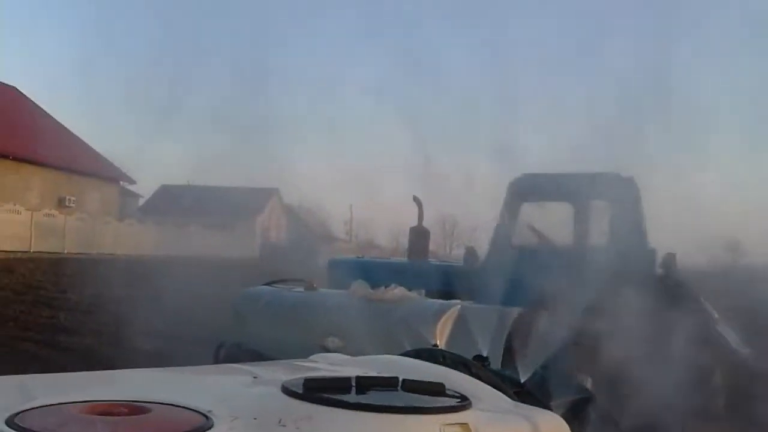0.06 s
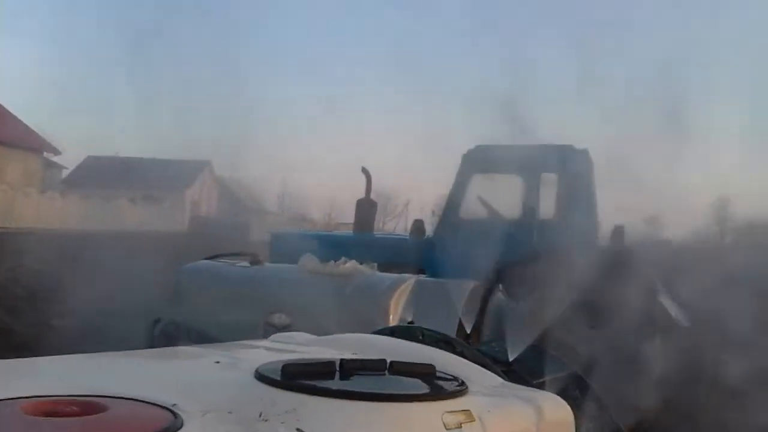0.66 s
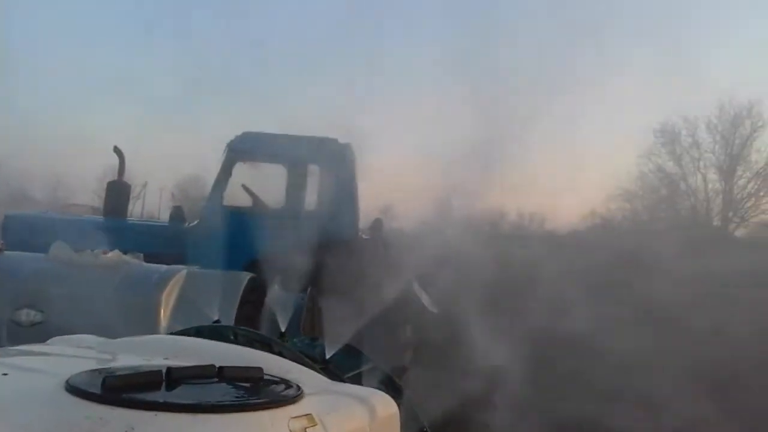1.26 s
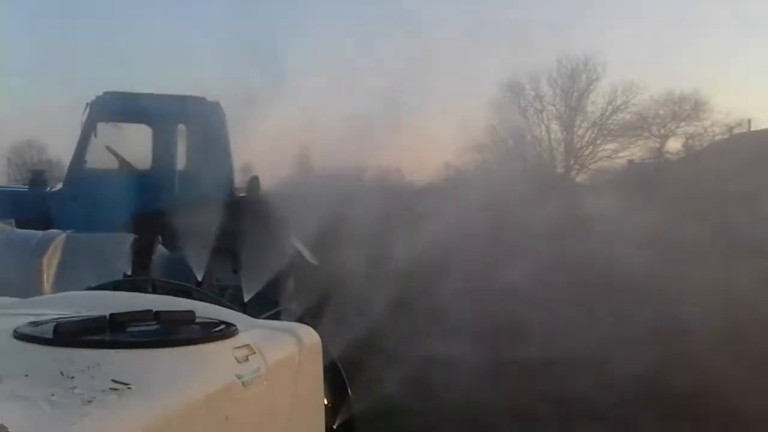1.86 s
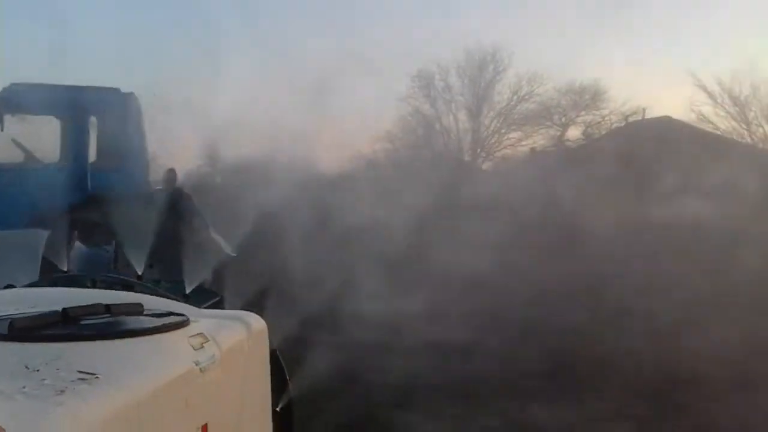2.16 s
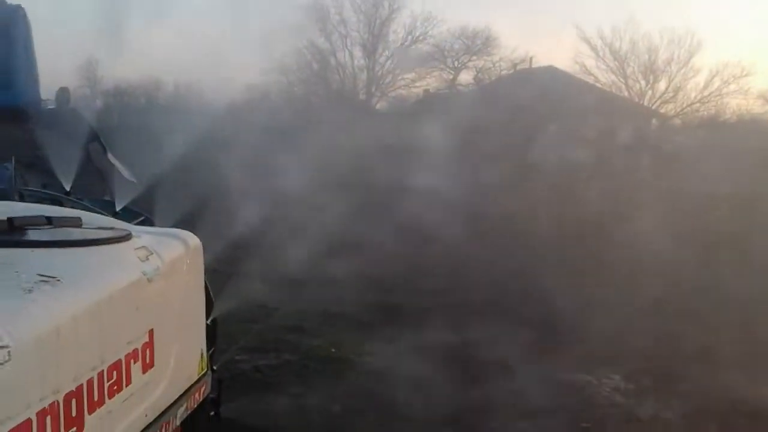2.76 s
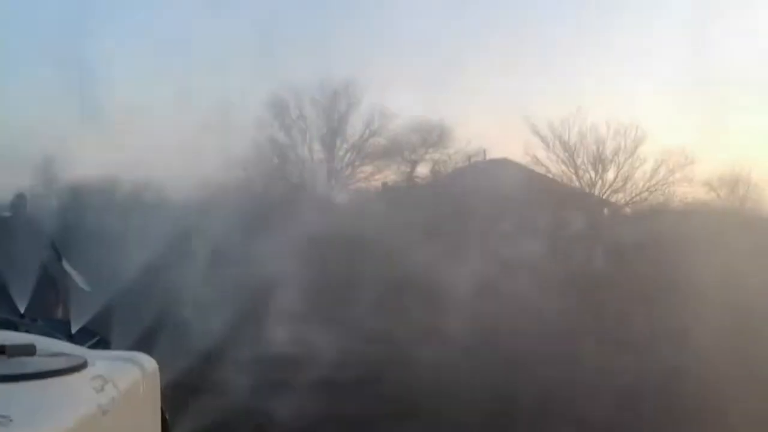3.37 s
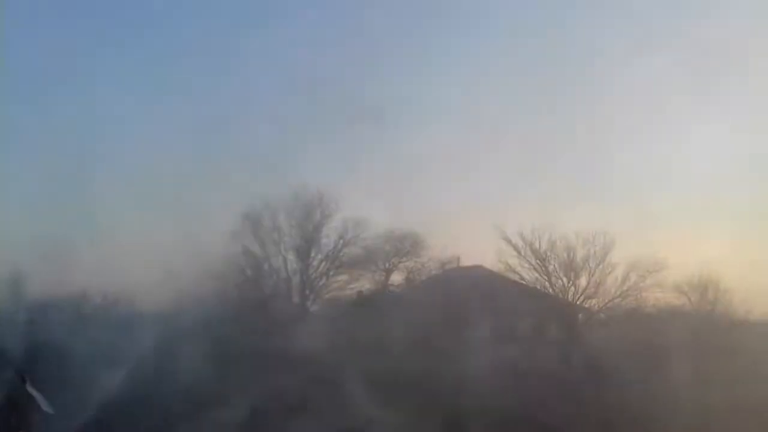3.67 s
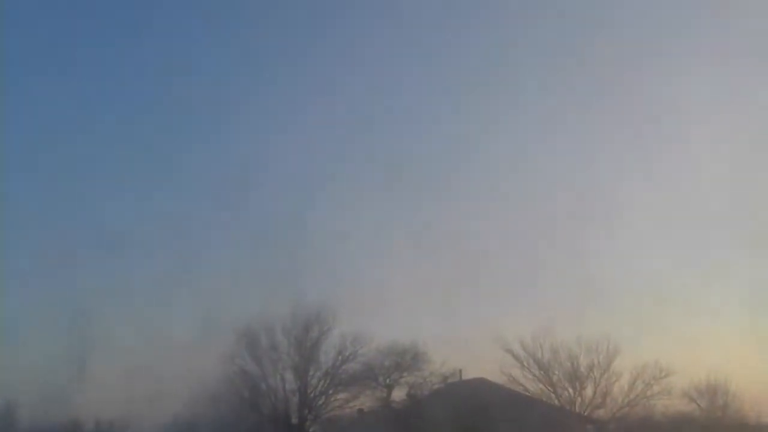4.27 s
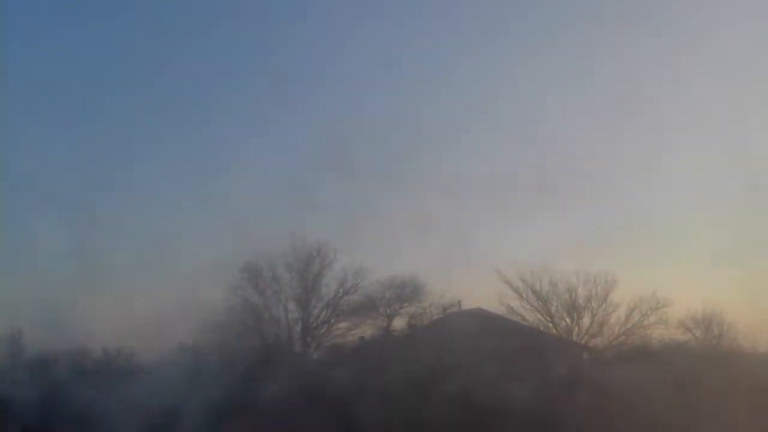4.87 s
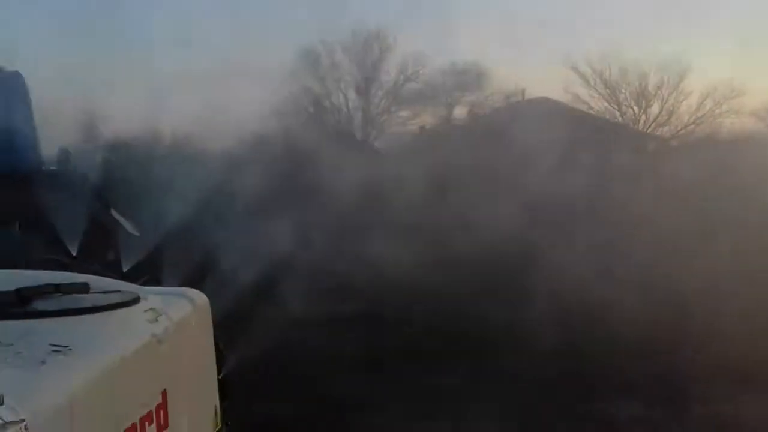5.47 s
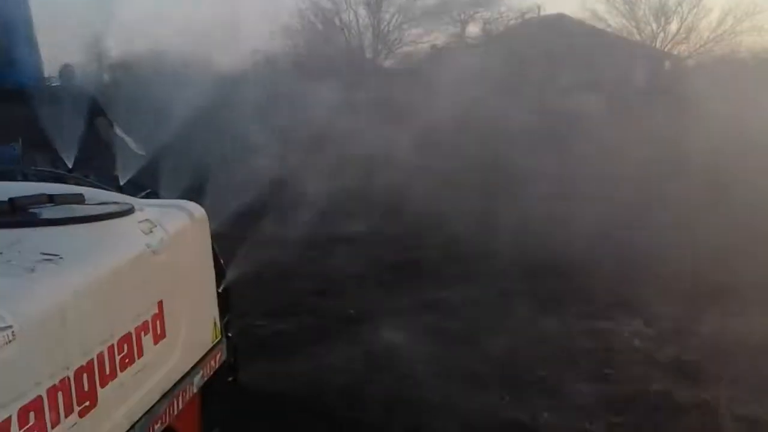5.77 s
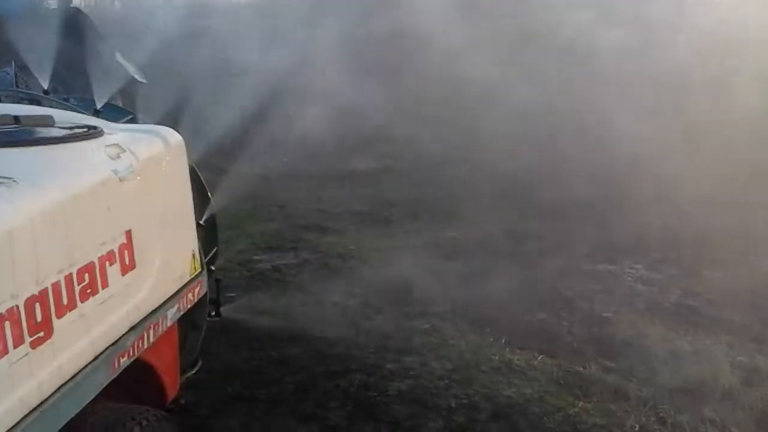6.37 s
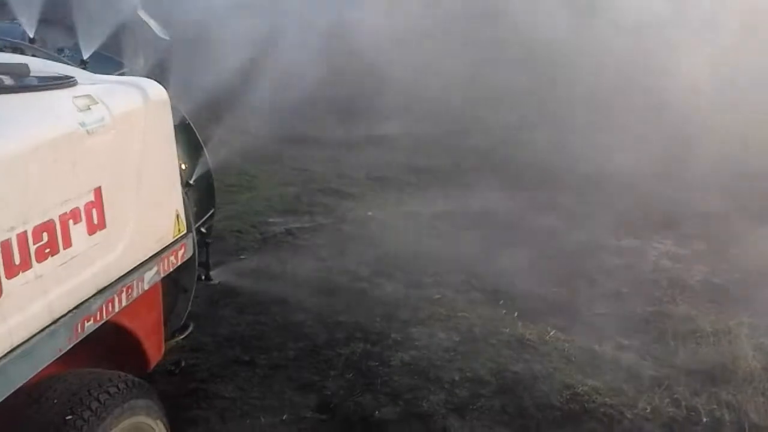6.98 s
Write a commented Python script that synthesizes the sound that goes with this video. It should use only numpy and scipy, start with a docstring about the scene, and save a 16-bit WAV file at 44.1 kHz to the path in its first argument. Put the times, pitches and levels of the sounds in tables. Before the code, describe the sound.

A tractor's diesel engine throbs and knocks under the steady roar and howl of a sprayer fan, with nozzles hissing.

```python
"""An open field, beside the tank of an air-blast orchard sprayer driven by a tractor at working speed.
The four-cylinder diesel throbs unevenly as its firings ring the exhaust pipe, and the block knocks.
The geared fan howls on its blade tones over a roar of air, and the nozzles hiss.
The listener turns from the tractor towards the fan, so the tones swell and the hiss shifts colour."""
import sys
import numpy as np
from scipy import signal
from scipy.fft import rfft, irfft, next_fast_len
from scipy.io import wavfile
from scipy.ndimage import uniform_filter1d, minimum_filter1d, map_coordinates

SR = 44100
rng = np.random.default_rng(int(sys.argv[2]) if len(sys.argv) > 2 else 0)


def store_pcm(level_fs):
    """Save levels as 16-bit WAV."""
    pcm = np.round(np.clip(level_fs, -1, 1) * 32767).astype(np.int16)
    wavfile.write(sys.argv[1], SR, np.atleast_2d(pcm).T)


N = 319284
T = np.arange(N) / SR

# each cylinder's accent, in firing order: pulse_db, rasp_db, knock_db
CYLINDERS = [(-1.5, -13, 13), (-2.3, -7, 8), (-27, -16, -16), (-21, -8.5, -12)]


def from_db(db):
    """Decibels to gain."""
    return 10 ** (np.asarray(db) / 20)


def unit_rms(x):
    """Scale to rms 1."""
    return x / np.sqrt(np.mean(x ** 2) + 1e-20)


def automation(rows):
    """Turn breakpoints (time_s, values...) into one curve per value, at every sample."""
    time_s, *columns = np.transpose(rows)
    return [np.interp(T, time_s, column) for column in columns]


def drift(rate_hz):
    """Smooth random wander, rms about 1."""
    hop, settle = 40, 2000  # samples per control step, run-in steps
    pole = np.exp(-2 * np.pi * rate_hz * hop / SR)
    white = rng.standard_normal(N // hop + settle + 2)
    slow = signal.lfilter([1], [1, -2 * pole, pole * pole], white)[settle:]
    return np.interp(np.arange(N) / hop, np.arange(len(slow)), unit_rms(slow))


def noise(colour):
    """Steady turbulence of the given colour, rolling off beyond the table's ends; rms 1."""
    size = next_fast_len(N)
    hz, db = np.transpose(colour)
    bins_hz = np.maximum(np.arange(size // 2 + 1) * SR / size, 1)
    gain = from_db(np.interp(np.log(bins_hz), np.log(hz), db))
    gain *= np.minimum(bins_hz / hz[0], 1) ** 2 * np.minimum(hz[-1] / bins_hz, 1) ** 2
    white_spectrum = rfft(rng.standard_normal(size))
    return unit_rms(irfft(white_spectrum * gain, size)[:N])


def firings(cycle, cylinder_db, spread_db, jitter_s):
    """One click per firing, four to a cycle, loosened in level and timing by spread and jitter."""
    first_firing = .215  # share of a cycle before the first cylinder fires
    stroke = np.floor(len(cylinder_db) * (cycle - first_firing)).astype(int)
    onsets = np.flatnonzero(np.diff(stroke)) + 1
    cylinder = stroke[onsets] % len(cylinder_db)
    time_scatter, level_scatter = rng.standard_normal((len(onsets), 2)).T
    onsets += np.round(jitter_s * SR * time_scatter).astype(int)
    clicks = np.zeros(N)
    clicks[np.clip(onsets, 0, N - 1)] = from_db(cylinder_db[cylinder] + spread_db * level_scatter)
    return clicks


def bursts(clicks, delay_s, rise_s, decay_s):
    """An envelope in which each click opens a short swell that dies away; rms 1."""
    for tau_s in (rise_s, decay_s):
        clicks = signal.lfilter([1], [1, -np.exp(-1 / (tau_s * SR))], clicks + 1e-18)
    return unit_rms(np.interp(T - delay_s, T, clicks))


def resonate(x, pitch_hz, width_hz):
    """One ringing resonance, gain 1 at its peak."""
    radius = np.exp(-np.pi * width_hz / SR)
    feedforward = np.array([1, 0, -1]) * (1 - radius ** 2) / 2
    feedback = [1, -2 * radius * np.cos(2 * np.pi * pitch_hz / SR), radius ** 2]
    return signal.lfilter(feedforward, feedback, x + 1e-18)


def pipe(pulses, modes):
    """Standing waves in the exhaust; neighbouring ones reach the outlet with opposite sign."""
    return sum((-1) ** k * from_db(level_db) * resonate(pulses, pitch_hz, width_hz)
               for k, (pitch_hz, width_hz, level_db) in enumerate(modes))


def exhaust(cycle, boom_db, bark_db):
    """Two strong firings and two weak ones ring the pipe, so the engine throbs once a cycle."""
    # deep and upper resonances of pipe and silencer: pitch_hz, width_hz, level_db
    boom_modes = [(65, 37, -43), (100.4, 17.7, -31)]
    bark_modes = [(160.7, 9.7, -31), (236.5, 9.1, -33.5), (355, 39, -49)]
    # colour of the escaping gas: frequency_hz, level_db
    rasp_colour = [(100, -15), (170, -5), (250, -11.5), (350, -1), (480, -1.5), (800, -1)]
    pulse_db, rasp_db, _ = np.transpose(CYLINDERS)
    samples_per_cycle = N / cycle[-1]
    pulses = samples_per_cycle * firings(cycle, pulse_db, spread_db=.5, jitter_s=.00012)
    # the valves open gradually and the narrow stack radiates little deep bass
    pulses = signal.sosfilt(signal.butter(4, [54, 520], "band", fs=SR, output="sos"), pulses)
    boom, bark = pipe(pulses, boom_modes), pipe(pulses, bark_modes)
    # gas tears out of the pipe behind each pulse
    releases = firings(cycle, rasp_db, spread_db=0, jitter_s=.00019)
    puffs = bursts(releases, delay_s=.0037, rise_s=.0024, decay_s=.006)
    rasp = from_db(-25) * puffs * noise(rasp_colour)
    return from_db(boom_db) * boom + from_db(bark_db) * (bark + rasp)


def diesel_clatter(cycle, level_db):
    """Combustion knock: a short bright burst from the block at each firing."""
    # colour of the knock: frequency_hz, level_db
    knock_colour = [(600, -20), (1200, 4.5), (2000, 7), (3000, -2.5), (4500, -4), (6000, -12),
                    (8000, -18.5), (15000, -27)]
    _, _, knock_db = np.transpose(CYLINDERS)
    knocks = firings(cycle, knock_db, spread_db=.5, jitter_s=.00046)
    envelope = bursts(knocks, delay_s=.0022, rise_s=.00064, decay_s=.009)
    return from_db(level_db - 27.5) * envelope * noise(knock_colour)


def fan_tones(cycle):
    """The blades howl at multiples of the shaft rate; gusty inflow makes each tone waver."""
    # how the tones beam at the listener: time_s, blade_db, sideband_db, whistle_db, whine_db
    beam = [(0, -26, -27, -34, -36), (.6, -23, -36, -25.5, -29), (1.2, -32.5, -25, -25.5, -30),
            (1.55, -18, -32, -24.5, -28.5), (2.0, -15.5, -36, -27.5, -23.5), (2.4, -17, -31, -30, -29.5),
            (2.8, -19.5, -28, -29, -22.5), (3.4, -18.5, -32, -25, -23.5), (3.8, -17, -28, -25, -23.5),
            (4.7, -17, -49, -25.5, -21), (5.25, -17.5, -39, -25, -22.5), (5.8, -18, -30, -28, -24),
            (6.5, -16.5, -27, -36, -30), (7.24, -16.5, -37, -27, -24.5)]
    blade_db, sideband_db, whistle_db, whine_db = automation(beam)
    turns = 2.1728 * cycle  # gearing: fan turns per engine cycle

    def tone(order, level_db, waver_db, waver_rad):
        phase = 2 * np.pi * (order * turns + rng.random()) + waver_rad * drift(rate_hz=21)
        return np.sqrt(2) * from_db(level_db + waver_db * drift(rate_hz=25)) * np.sin(phase)

    blades = tone(order=19, level_db=blade_db, waver_db=1, waver_rad=.21)
    blades += tone(order=38, level_db=blade_db - 18.5, waver_db=1, waver_rad=.12)
    whistle = tone(order=34, level_db=whistle_db, waver_db=-.3, waver_rad=.1)
    whine = tone(order=53, level_db=whine_db, waver_db=1.2, waver_rad=.15)
    # unequal blades put weak tones one shaft rate to the side
    sidebands = tone(order=20, level_db=sideband_db, waver_db=-4, waver_rad=.22)
    sidebands += tone(order=37, level_db=blade_db - 11.5, waver_db=1, waver_rad=.44)
    return blades + whistle + whine + sidebands


def air_blast(body_db, edge_db):
    """The fan's turbulent roar as two fluttering layers: its body and its bright upper edge."""
    # colours of the rushing air: frequency_hz, level_db
    body_colour = [(60, -34), (100, -28), (190, -2.5), (280, -4.5), (380, -2), (500, -9.5), (630, 1.5),
                   (800, -0.3), (950, -0.5), (1200, 2.5), (1550, -.5), (1900, -5), (2400, -15), (3200, -50)]
    edge_colour = [(1200, -11), (1700, -6), (2000, 0.5), (2400, -2.5), (2800, -8.5), (3300, -15.5),
                   (5000, -56)]
    body = from_db(body_db + .82 * drift(rate_hz=14)) * noise(body_colour)
    edge = from_db(edge_db + .5 * drift(rate_hz=13)) * noise(edge_colour)
    return body, edge


def nozzle_spray(jet_db, sizzle_db, mist_db):
    """Liquid torn into mist: three bands of hiss that share one light sputter."""
    # colours of jet hiss, spray sizzle and fine mist: frequency_hz, level_db
    jet_colour = [(2600, -17), (3150, -5.5), (3600, 1.5), (4300, -2), (5000, -9), (6200, -28)]
    sizzle_colour = [(3300, -9), (4200, 0), (4900, 1.5), (5700, -1.5), (6600, -7), (8000, -14),
                     (11000, -38)]
    mist_colour = [(4500, -17), (7000, -6), (8500, -1), (10000, 1), (12000, -3), (15500, -1)]
    sputter = from_db(.42 * drift(rate_hz=37))
    jets = from_db(jet_db) * noise(jet_colour)
    sizzle = from_db(sizzle_db) * noise(sizzle_colour)
    mist = from_db(mist_db) * noise(mist_colour)
    return sputter * (jets + sizzle + mist)


def tank_reflection(direct):
    """Add an echo whose path lengthens as the listener moves, sliding a comb of dips down the hiss."""
    # glancing echo off the tank wall: time_s, delay_ms, echo_gain
    echo_path = [(0, .125, 0.03), (.6, 0.11, 0.02), (1.0, 0.16, 0.14), (1.5, 0.16, 0.2), (2.4, 0.16, 0.2),
                 (3.3, 0.18, 0.2), (4.2, 0.21, 0.16), (5.3, 0.19, 0), (6, 0.23, 0.2), (6.7, .232, 0.15),
                 (7.24, .232, 0.1)]
    delay_ms, echo_gain = automation(echo_path)
    echo = map_coordinates(direct, [np.arange(N) - delay_ms * SR / 1000], order=3)
    return direct + echo_gain * echo


def scene():
    """The crankshaft times the exhaust, the knock and the fan over a bed of air and spray."""
    # engine speed: time_s, crank_rpm
    engine_speed = [(0.0, 1688.2), (1.0, 1693.6), (2.0, 1703.3), (2.7, 1705.0), (3.8, 1700.2),
                    (4.7, 1700.9), (5.3, 1703.8), (5.9, 1713.8), (7.24, 1711.6)]
    # what reaches the listener from the engine: time_s, boom_db, bark_db, clatter_db
    engine_mix = [(0, -3.5, 0.7, 2.5), (.8, -2, 2.5, 2.5), (1.4, -2, 2.5, 3), (1.9, -2, 2, -2),
                  (2.4, -1, -1, -3.5), (2.9, 1, 2, 1), (4.5, 1, 0.5, -0.5), (5.3, 0, 0.5, -1.5),
                  (6, 1.5, 2.5, 1.5), (7.24, -0.2, 2, 0.5)]
    # air and spray faders: time_s, roar_db, edge_db, jet_db, sizzle_db, mist_db
    flow_mix = [(0, -15.5, -21.5, -34.5, -29, -38.5), (.8, -15.5, -19.5, -32, -29, -40),
                (1.4, -14.5, -21.5, -33.5, -30, -39.5), (1.9, -17.5, -23, -35, -32.5, -42),
                (2.4, -17, -24.5, -38, -34, -43.5), (2.9, -15, -25.5, -31, -33.5, -43),
                (3.6, -16.5, -24, -33.5, -32.5, -41.5), (4.5, -15.5, -26.5, -34, -32.5, -41.5),
                (5.3, -16, -28, -29.5, -34, -43.5), (6, -16.5, -31, -28, -34.5, -44),
                (6.6, -16, -29.5, -28.5, -34.5, -43), (7.24, -16, -35, -27, -34.5, -44)]
    rpm, = automation(engine_speed)
    boom_db, bark_db, clatter_db = automation(engine_mix)
    roar_db, edge_db, jet_db, sizzle_db, mist_db = automation(flow_mix)
    cycle = np.cumsum(rpm / 120) / SR  # two crank turns to a four-stroke cycle
    roar, roar_edge = air_blast(roar_db, edge_db)
    spray = nozzle_spray(jet_db, sizzle_db, mist_db)
    throb = exhaust(cycle, boom_db, bark_db)
    howl = fan_tones(cycle)
    clatter = diesel_clatter(cycle, clatter_db)
    return (throb + howl + roar + tank_reflection(roar_edge + spray + clatter))[None]


def record(dry):
    """A look-ahead limiter eases any peaks over its ceiling down, and a steep low-pass cuts the top."""
    ceiling, window_samples, cutoff_hz = .92, 129, 15750
    gain = np.minimum(1, ceiling / (np.abs(dry) + 1e-9))
    gain = uniform_filter1d(minimum_filter1d(gain, size=window_samples), size=window_samples)
    low_pass = signal.ellip(12, .1, 90, cutoff_hz, fs=SR, output="sos")
    return signal.sosfilt(low_pass, dry * gain)


dry = scene()
out = record(dry)
store_pcm(out)
```